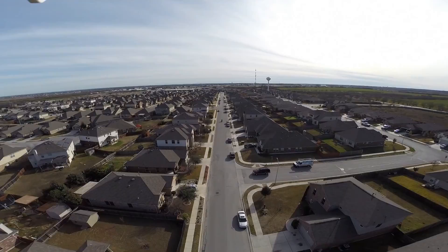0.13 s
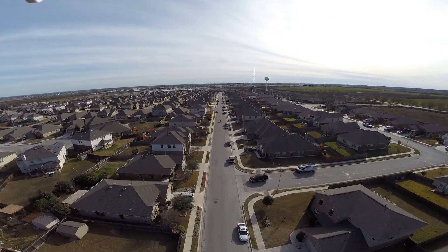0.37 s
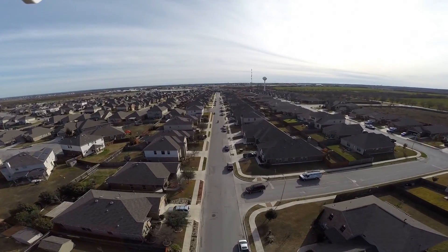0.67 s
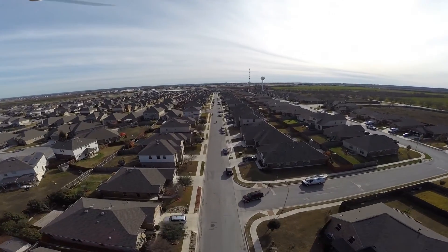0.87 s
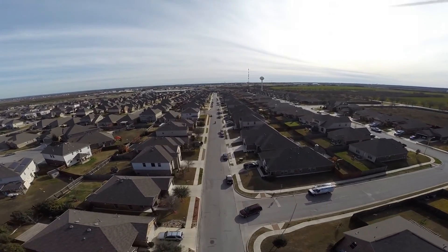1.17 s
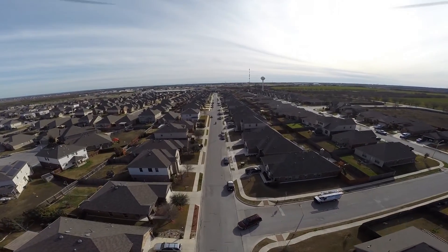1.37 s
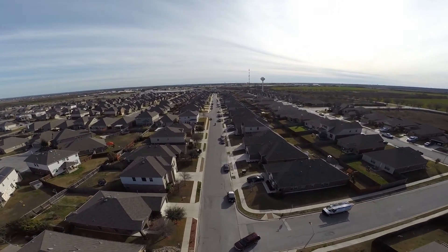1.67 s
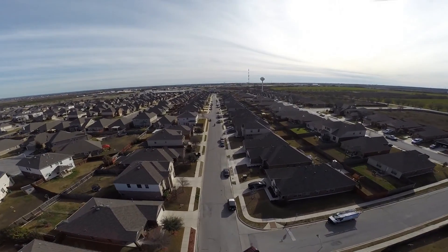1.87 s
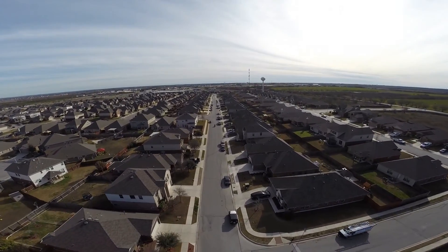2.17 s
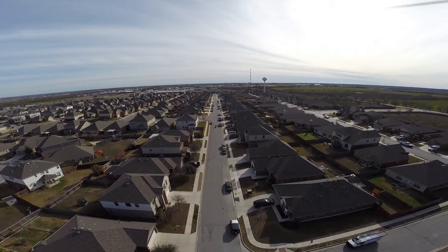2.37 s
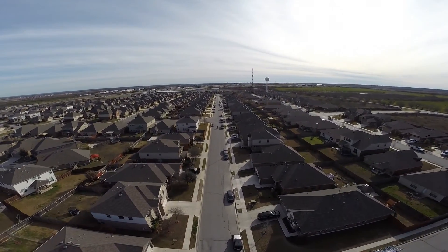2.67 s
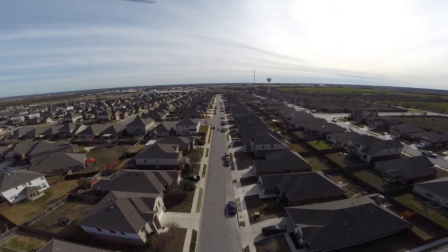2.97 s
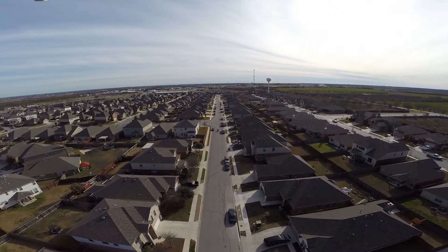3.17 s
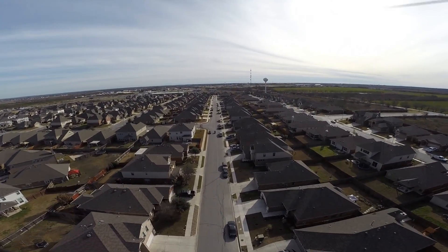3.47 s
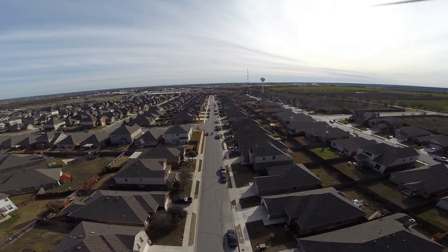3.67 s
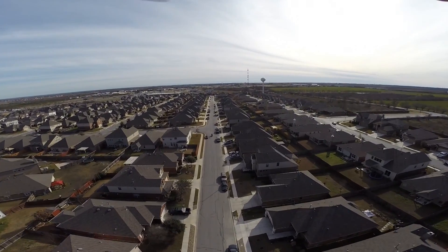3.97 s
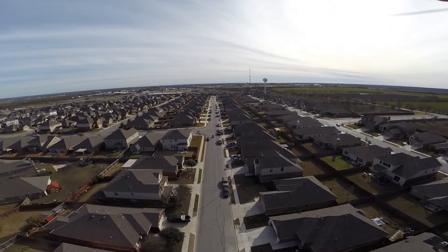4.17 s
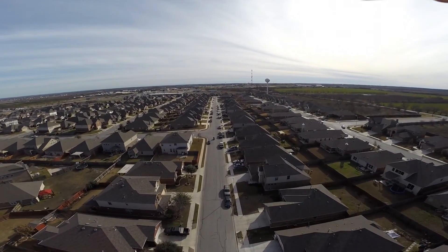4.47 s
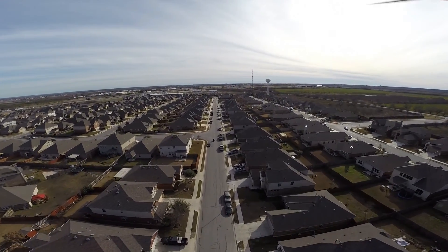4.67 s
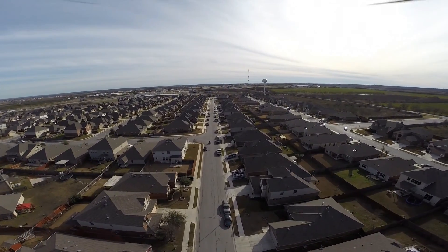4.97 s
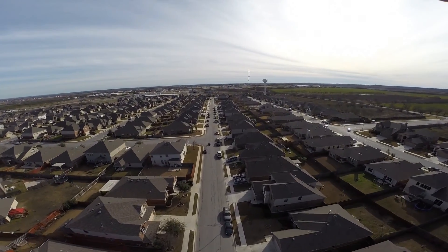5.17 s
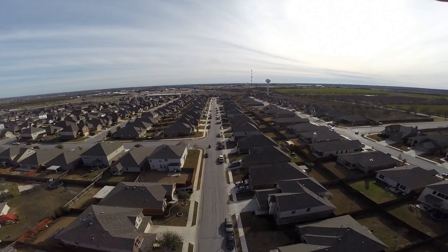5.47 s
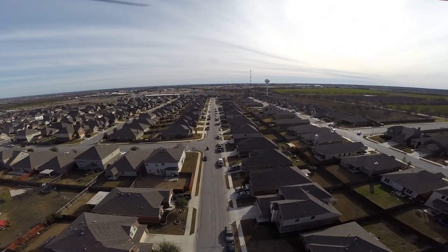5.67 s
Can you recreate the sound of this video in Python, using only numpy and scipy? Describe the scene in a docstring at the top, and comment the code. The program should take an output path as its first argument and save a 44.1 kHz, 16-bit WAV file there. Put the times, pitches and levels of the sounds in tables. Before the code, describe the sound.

A close, mono, on-board sound of a drone cruising outdoors. Slightly mismatched propellers make a rough, pulsating hum, subdued at first. A loud, short plastic chatter with a buzzy squeak snaps near the start as the hum dips. The hum then grows fuller, with plastic shell buzz, faint high whine and fluttering air hiss, and runs on without stopping.

```python
"""A throbbing drone comes first: a quadcopter cruises high over houses, heard from the camera it carries.
Four rotors at slightly different speeds beat against each other, shake the shell and chop the air.
Early on the camera mount chatters, scrapes and squeaks in one sharp, buzzing click.
The drone is subdued there and swells back, with thin whines, a wavering note and rushing air."""
import sys
import numpy as np
from scipy import signal
from scipy.fft import rfft, irfft
from scipy.io import wavfile

SR = 44100
rng = np.random.default_rng(int(sys.argv[2]) if len(sys.argv) > 2 else 0)


def unload_audio(sound):
    """Save the sound as a 16-bit wav file, at the path given as the first command line argument."""
    columns = np.transpose(np.atleast_2d(sound))
    # keep every value between -1 and 1, then stretch to whole-number steps
    steps = np.round(np.clip(columns, -1, 1) * 32767)
    wavfile.write(sys.argv[1], SR, steps.astype(np.int16))


N = 257544
TIME = np.arange(N) / SR  # seconds
FREQS = np.fft.rfftfreq(N, 1 / SR)  # Hz

# Speeds of the four rotors, trimmed by the flight controller:
# (time [s], rotor 1 [rev/s], rotor 2 [rev/s], rotor 3 [rev/s], rotor 4 [rev/s])
ROTOR_SPEEDS = [(0.0, 92.2, 109.1, 118.6, 125.6), (0.26, 95.2, 108.7, 118.4, 125.6),
                (0.46, 94.5, 105.9, 116.6, 124.8), (0.66, 96.2, 104.6, 117.0, 122.2),
                (1.0, 97.3, 102.8, 112.3, 120.1), (1.55, 98.8, 105.2, 116.1, 121.7),
                (1.84, 95.9, 101.7, 112.5, 121.6), (2.01, 95.6, 100.3, 112.9, 119.9),
                (2.13, 94.5, 100.2, 111.2, 119.2), (3.05, 91.7, 104.2, 114.5, 121.5),
                (3.34, 92.8, 99.8, 114.4, 119.8), (3.68, 92.6, 95.0, 107.4, 117.1),
                (3.89, 96.7, 96.8, 109.6, 115.6), (4.11, 93.2, 98.5, 109.3, 117.7),
                (4.7, 96.0, 102.1, 115.3, 120.0), (5.05, 97.0, 96.7, 109.7, 117.9),
                (5.48, 96.8, 102.4, 114.6, 119.8), (5.84, 99.2, 98.8, 114.3, 118.1)]
# Hum of each rotor before swell, load and flutter, one row a rotor: (shaft orders 1 to 8 [dB rms each]).
# Order 1 is imbalance, order 2 the two blades passing.
ROTOR_ORDERS = [(-25, -23, -42, -45, -57.5, -59, -55, -51.5),
                (-41, -25.5, -41.5, -48.5, -58.5, -58.5, -52.5, -60.5),
                (-27, -24, -49, -42, -51, -51.5, -54.5, -57), (-35.5, -31, -59, -47, -63, -78, -60, -65)]
# How each rotor's hum changes as it speeds up, towards or away from a resonance of its arm:
# (rotors 1 to 4 [dB per rev/s])
ROTOR_LOAD = [-0.022, -0.53, 0.94, 0.33]
# Rise and fall of the frame's buzz, with a dip at the click: (time [s], level change [dB])
FRAME_SWELL = [(0, -8.5), (.27, -7.5), (.34, -13), (.75, -7), (1.3, -0.2), (3.5, .5), (5.84, 0)]
# Brief lulls of the blade tone, where two rotors run at nearly the same speed:
# (middle [s], half length [s], level change [dB])
BLADE_LULLS = [(3.885, .075, -9), (5.84, .12, -5)]
# Shell resonances that the motors excite, before the swell: (pitch [Hz], half width [Hz], level [dB rms])
SHELL_RESONANCES = [(292.8, 17.6, -37), (760, 51, -47), (1216, 26, -54), (1284.5, 17, -51.5),
                    (1710, 25, -54), (1793, 35, -48.5), (4500, 72, -54.5), (4520, 280, -52)]
# Thin motor lines, the first from commutation and the second from a bearing; levels are before
# the shell, waver and swell: (order [cycles per turn], rotors 1 to 4 [dB rms each])
WHINE_LINES = [(41.9, -64, -51, -51, -53), (46.9, -56, -57, -74, -68)]
# The note that the fastest rotor's sixth order sings in the shell: (time [s], level [dB rms])
SING_LEVEL = [(0, -39), (.28, -38.5), (.45, -42.5), (1.7, -33.5), (2.2, -36), (2.6, -33), (3.48, -30.5),
              (3.8, -44), (4.1, -35.5), (4.65, -33.5), (5.15, -38.5), (5.5, -35), (5.84, -38.5)]
# Strength of the air flow, as the level of its hiss: (time [s], level [dB rms])
AIR_FLOW = [(0, -50.5), (.27, -47), (.36, -51), (.6, -46.5), (1.15, -41), (1.5, -41.5), (1.76, -37),
            (2.06, -36.5), (2.3, -39.3), (2.9, -39.5), (3.02, -37.5), (3.5, -39), (4.1, -40), (4.5, -42.3),
            (4.96, -37.5), (5.4, -41.5), (5.58, -35), (5.84, -37.5)]
# Tone colour of the low churning air: (frequency [Hz], relative level [dB per Hz])
CHURN_COLOUR = [(20, -1.5), (48, 5.5), (80, 7.5), (150, -0.5), (290, -1.5), (360, -10), (420, -11.5),
                (520, -1), (610, -8.5), (750, 3), (860, -10.5), (1100, -19), (1450, -29), (2400, -40.5)]
# Tone colour of the hiss off the blades, also used for the ticks: (frequency [Hz], relative level [dB per Hz])
HISS_COLOUR = [(500, 7), (1300, -0.5), (2000, 2), (2300, -4), (2700, 1.5), (3800, 0.5), (4300, 5.5),
               (5100, -3), (5800, -10), (6800, -6), (8200, -11.5), (9800, -15), (11800, -5), (13500, -10),
               (15300, -7)]
# Scraping of the mount, briefly and then longer: (peak time [s], peak [dB rms], rise [dB/s], fall [dB/s])
MOUNT_SCRAPES = [(0.2735, -28, 20000, 5000), (.290, -20, 2400, 562)]
# Tone colour of the scraping: (frequency [Hz], relative level [dB per Hz])
SCRAPE_COLOUR = [(300, 5), (800, 16), (1900, -2), (2600, -6.5), (3600, -19), (4280, 4.5), (4900, -8.5),
                 (6300, -12), (7050, 1.5), (7700, -16), (8800, -30), (15000, -23)]
# Contacts of the chattering mount: (time [s], relative strength [dB])
MOUNT_CONTACTS = [(0.2737, -14.5), (0.2777, -5.5), (.2852, -12), (0.2894, -3), (0.2932, -10),
                  (0.3115, -6.5), (0.3152, -20)]
# What the mount rings with: (pitch [Hz], relative level [dB], time to fall by 60 dB [s])
MOUNT_RING = [(276, -13.5, 0.11), (520, -4.5, 0.033), (745, 0, 0.03), (1040, -3, 0.015),
              (1170, -3.5, 0.018), (1300, -14.5, 0.048), (1450, -11, 0.021), (1870, -16, 0.025),
              (2043, -32, 0.035), (2510, -33, 0.013), (3140, -28.5, 0.023)]
# The squeak's harmonics, from the first up: (relative level [dB])
SQUEAK_HARMONICS = [-27, -4, -12, -1, -20.5, -30, -19, -21.5]


def gain_of(db):
    """Turns decibels into an amplitude factor."""
    return 10 ** (np.asarray(db) / 20)


def evened(x):
    """Scales to an rms (average strength) of one."""
    return x / np.sqrt(np.mean(x ** 2) + 1e-20)


def curves(rows):
    """Draws straight lines between the times of a table and returns each column at every sample."""
    times, *columns = np.transpose(rows)
    return [np.interp(TIME, times, column) for column in columns]


def colour(x, points):
    """Filters x through a curve of (Hz, dB) points, then evens its strength."""
    hz, db = np.transpose(points)
    curve_db = np.interp(np.log(FREQS + 1), np.log(hz), db)
    return evened(irfft(rfft(x) * gain_of(curve_db), N))


def wander(rate_hz):
    """Smooth random drift, made of noise that fades out above about the given rate."""
    spectrum = rfft(rng.standard_normal(N))
    return evened(irfft(spectrum * np.exp(-(FREQS / rate_hz) ** 2), N))


def resonate(x, hz, half_width):
    """Lets through sound near one pitch, like a resonance with steep skirts."""
    response = 1 / (1 + 1j * (FREQS - hz) / half_width) ** 2
    return evened(irfft(rfft(x) * response, N))


def shaft_angles(nudge_rad=.045, nudge_hz=18):
    """Adds up speed into each shaft's angle [rad]; gusts and the speed controller nudge it slightly."""
    angles = []
    for speed in curves(ROTOR_SPEEDS):
        turns = np.cumsum(speed) / SR + rng.random()
        angles.append(2 * np.pi * turns + nudge_rad * wander(nudge_hz))
    return angles


def hum(angles, overtone_follow=.7, flutter_db=1.03, flutter_hz=14):
    """Imbalance and passing blades hum at multiples of shaft speed; near pitches throb together."""
    swell_db, = curves(FRAME_SWELL)
    low_swell = gain_of(swell_db)
    high_swell = gain_of(overtone_follow * swell_db)  # orders above 2 follow only part of the swell
    lull_db = sum(db * np.exp(-((TIME - middle) / half) ** 2) for middle, half, db in BLADE_LULLS)
    out = np.zeros(N)
    for angle, speed, orders_db, load_db in zip(angles, curves(ROTOR_SPEEDS), ROTOR_ORDERS, ROTOR_LOAD):
        waves = []
        for order, db in enumerate(orders_db, 1):
            waves.append(gain_of(db) * np.cos(order * angle + 2 * np.pi * rng.random()))
        imbalance, blades, *overtones = waves
        tone = low_swell * (imbalance + gain_of(lull_db) * blades) + high_swell * sum(overtones)
        change_db = load_db * (speed - speed.mean()) + flutter_db * wander(flutter_hz)
        out += np.sqrt(2) * tone * gain_of(change_db)  # root two turns rms into peak
    return out


def shell(angles, rough=0.99, flicker_db=2, flicker_hz=35):
    """Each turn knocks the motor bearings; knocks and noise make the shell ring at its resonances."""
    turns = np.floor(np.array(angles) / (2 * np.pi))
    knocks = np.diff(turns, prepend=turns[:, :1]).sum(axis=0)
    drive = evened(knocks) + rough * rng.standard_normal(N)
    ring = sum(gain_of(db) * resonate(drive, hz, width) for hz, width, db in SHELL_RESONANCES)
    return ring * evened(gain_of(flicker_db * wander(flicker_hz)))


def ticking(per_s=110, spread_db=0.5, level_db=-51):
    """Vibrating plastic parts tick at random moments, with slightly uneven strengths."""
    strengths = gain_of(spread_db * np.minimum(rng.exponential(1, N), 4))
    directions = rng.choice([-1, 1], N)
    happens = rng.random(N) < per_s / SR
    return gain_of(level_db) * colour(strengths * directions * happens, HISS_COLOUR)


def whine(shell_hz=4500, shell_width_hz=68, waver_db=2, waver_hz=4):
    """Faint high lines glide with each motor and light up as they cross a shell resonance."""
    out = np.zeros(N)
    for order, *levels in WHINE_LINES:
        for speed, db in zip(curves(ROTOR_SPEEDS), levels):
            hz = order * speed
            passed = 1 / np.hypot(1, (hz - shell_hz) / shell_width_hz)
            line = np.sqrt(2) * np.sin(2 * np.pi * np.cumsum(hz) / SR)
            out += line * passed * gain_of(db + waver_db * wander(waver_hz))
    return out


def sing(angles, waver_db=3.2, waver_hz=22):
    """The fastest rotor's sixth order sits on a shell resonance and stands out as a wavering note."""
    level_db, = curves(SING_LEVEL)
    note = np.sqrt(2) * np.cos(6 * angles[3])
    return note * gain_of(level_db) * evened(gain_of(waver_db * wander(waver_hz)))


def blade_chop(angles, sharpness=4.1):
    """Makes a puff each time a blade sweeps past an arm, twice a turn."""
    return evened(sum(np.exp(sharpness * np.cos(2 * angle)) for angle in angles))


def air(angles, churn_chop=0.31, hiss_chop=.35, churn_gust_db=1.5, hiss_gust_db=0.74, gust_hz=40):
    """Turbulent air churns over the body and hisses off the blades, both chopped at the blade rate."""
    churn_db, churn_follow = -31, 0.69  # dB rms at average flow; dB per dB of flow
    flow_db, = curves(AIR_FLOW)
    chop, gust = blade_chop(angles), wander(gust_hz)
    churn_strength = (1 - churn_chop + churn_chop * chop) * gain_of(churn_gust_db * gust)
    hiss_strength = (1 - hiss_chop + hiss_chop * chop) * gain_of(hiss_gust_db * gust)
    churn = colour(rng.standard_normal(N) * churn_strength, CHURN_COLOUR)
    hiss = colour(rng.standard_normal(N) * hiss_strength, HISS_COLOUR)
    churn_level_db = churn_db + churn_follow * (flow_db - flow_db.mean())
    return churn * gain_of(churn_level_db) + hiss * gain_of(flow_db)


def scrape():
    """The mount rubs twice: each scrape is coloured noise that swells and dies away."""
    strength = np.zeros(N)
    for peak_s, db, rise, fall in MOUNT_SCRAPES:
        drop_db = np.maximum(rise * (peak_s - TIME), fall * (TIME - peak_s))
        strength += gain_of(db - drop_db)
    return strength * colour(rng.standard_normal(N), SCRAPE_COLOUR)


def chatter(level_db=-2.0, contact_s=0.00077):
    """The mount bounces against its stop, each soft contact setting off the same fading ring."""
    t = TIME[:SR // 4]
    ring = sum(gain_of(db - 60 * t / t60) * np.sin(2 * np.pi * hz * t) for hz, db, t60 in MOUNT_RING)
    ring *= 1 - np.exp(-(t / contact_s) ** 2)  # a soft contact starts gradually
    blows = np.zeros(N)
    for time_s, db in MOUNT_CONTACTS:
        blows[round(time_s * SR)] -= gain_of(db + level_db)
    return signal.oaconvolve(blows, ring)[:N]


def squeak(start_s=.28696, attack_s=0.0023, hold_s=0.016, slip_hz=253.2):
    """The mount sticks and slips between contacts: a harmonic buzz only a few cycles long."""
    peak_db, sag, release = -3, 400, 1350  # dB; dB/s while held; dB/s afterwards
    t = np.maximum(TIME - start_s, 0)
    held = np.clip(t - attack_s, 0, hold_s)
    released = np.maximum(t - attack_s - hold_s, 0)
    tone = np.zeros(N)
    for harmonic, db in enumerate(SQUEAK_HARMONICS, 1):
        tone += gain_of(db) * np.sin(2 * np.pi * harmonic * slip_hz * t)
    attack = np.minimum(t / attack_s, 1)
    return tone * attack * gain_of(peak_db - sag * held - release * released)


def scene():
    """Adds up everything that reaches the camera's one microphone."""
    angles = shaft_angles()
    swell_db, = curves(FRAME_SWELL)
    body = (shell(angles) + ticking() + whine()) * gain_of(swell_db)
    drone = hum(angles) + body + sing(angles) + air(angles)
    click = scrape() + chatter() + squeak()
    return (drone + click)[None]


def record(dry, ceiling=.97, edge_hz=15400):
    """The camera gently rounds off the highest peaks, then removes the treble above its band edge."""
    rounded = dry / (1 + (dry / ceiling) ** 8) ** (1 / 8)
    low_pass = signal.firwin(511, edge_hz, window=("kaiser", 9), fs=SR)
    return signal.oaconvolve(rounded, low_pass[None], "same")


dry = scene()
out = record(dry)
unload_audio(out)
```